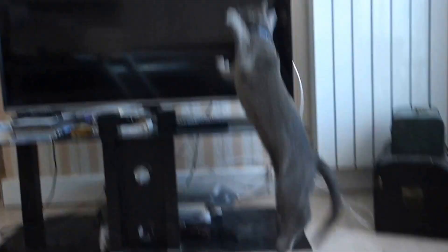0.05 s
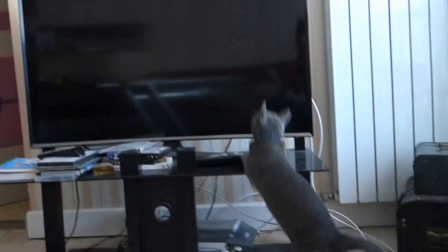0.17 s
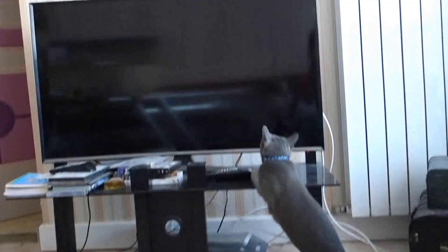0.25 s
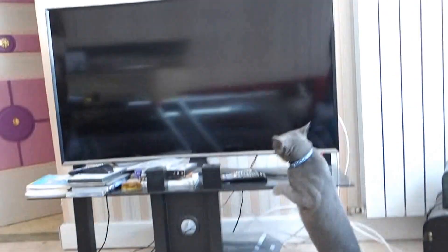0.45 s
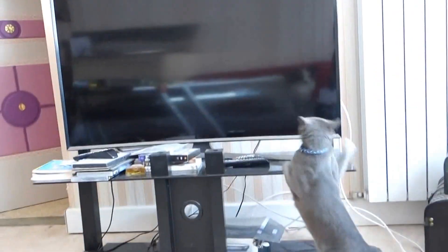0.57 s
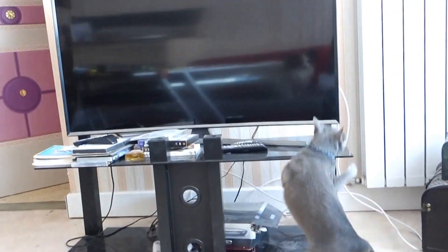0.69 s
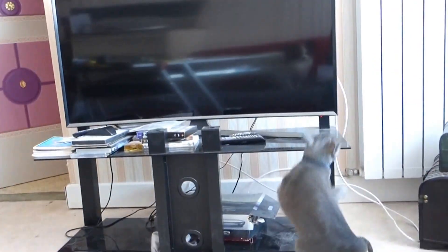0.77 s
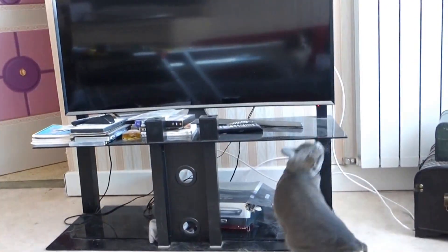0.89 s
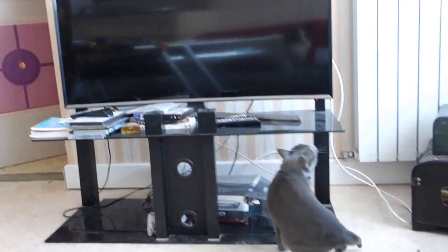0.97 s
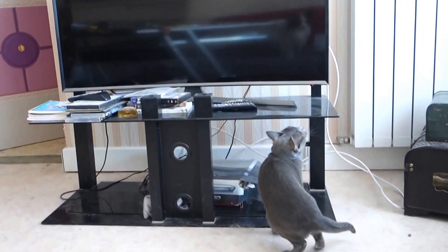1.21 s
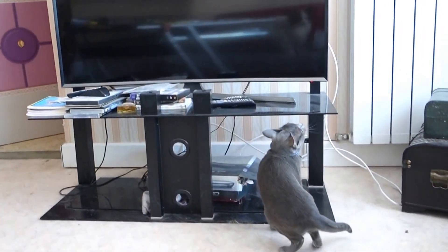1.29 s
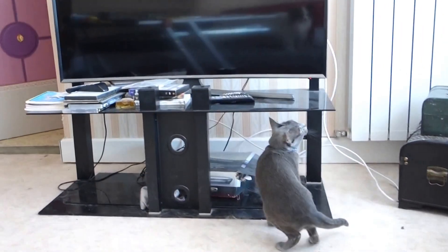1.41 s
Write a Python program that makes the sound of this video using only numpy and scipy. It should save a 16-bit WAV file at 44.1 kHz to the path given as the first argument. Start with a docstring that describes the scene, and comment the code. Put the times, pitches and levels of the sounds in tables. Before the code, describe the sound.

A cat clatters against a glass television stand, heard close in a living room with a short echo. A faint scuff, click and collar bell tinkle come first. At about 0.2 seconds the loud clatter sets the shelves briefly ringing. Lighter paw knocks follow from 0.4 to 0.75 seconds, then a dull floor thud with scuffs at 0.8. The high bell keeps jingling faintly, fading by 1.3 seconds.

```python
"""A faint scuff, a click and a tinkle of a collar bell, close by in a living room; then a cat drops
against a glass television stand. One loud clatter sets the shelves ringing, and lighter paw knocks follow.
The cat steps down and the floor gives a dull thud, while a loose pellet keeps striking the bell's shell.
A close stereo pair of microphones hears it all with a short room tail, brighter on the right."""
import sys
import numpy as np
from scipy import signal
from scipy.fft import rfft, irfft
from scipy.io import wavfile
from scipy.ndimage import uniform_filter1d

SR = 44100
rng = np.random.default_rng(int(sys.argv[2]) if len(sys.argv) > 2 else 0)


def store_wav(level_fs):
    """Save 16-bit WAV to argv[1]."""
    pcm = np.round(np.clip(np.atleast_2d(level_fs), -1, 1) * 32767)
    wavfile.write(sys.argv[1], SR, pcm.T.astype(np.int16))


N = 63945
T = np.arange(SR) / SR  # each event lasts one second
HZ = np.fft.rfftfreq(SR, 1 / SR)

# Levels are relative; t60 is the time to die away by 60 dB.
# decay of the living room: f/Hz, t60/s
ROOM_T60 = [(100, 0.54), (300, 0.31), (800, 0.42), (1500, 0.49), (3000, 0.38), (6000, 0.48), (14000, 0.28)]
# diffuse sound at the pair: f/Hz, left-right correlation
LIKENESS = [(30, 0.68), (100, .995), (280, 0.97), (500, .92), (1000, 0.75), (2000, .62), (4000, 0.37),
            (8000, 0.092), (15000, 0.099)]
# balance of the pair: f/Hz, left minus right/dB
BALANCE = [(100, 0), (500, -0.8), (1000, -0.5), (2000, -5), (4000, -8.5), (8000, -7.5), (14000, -9)]
# room tone and microphone hiss: f/Hz, level/dB
ROOM_TONE_COLOUR = [(25, -3), (70, -15), (120, -22.5), (200, -19), (330, -14.5), (470, -19), (580, -8.5),
                    (780, -12), (950, -3.5), (1200, -9), (2000, -13.5), (4200, -15), (8500, -19),
                    (14000, -16.5)]
# small dry clicks: t/s, level/dB
CLICKS = [(.0675, 0), (.468, -9), (.482, -10)]
# snap of a click: f/Hz, level/dB
CLICK_COLOUR = [(100, -47), (600, -28), (1200, -22), (2100, 3), (2700, -11), (3300, -2), (3780, 6.5),
                (4400, -2), (6000, -12), (8000, -11), (15000, -15)]
# ring of a click: f/Hz, level/dB, t60/s
CLICK_MODES = [(3360, -14, 0.024), (3690, -5.5, 0.029)]
# paw scuffs: t/s, level/dB
SCUFFS = [(0.017, -1), (.745, 11.5), (0.825, 14), (.843, 11), (1.002, 5.5), (1.072, -3.5)]
# rub of a paw: f/Hz, level/dB
SCUFF_COLOUR = [(100, -25), (800, -17), (2000, 4.5), (3500, 4), (5500, -2.5), (9000, -11), (15000, -25)]
# pellet strikes in the bell: t/s, ring pair level/dB, other partials and tick level/dB
JINGLES = [(.067, -10.5, -22), (.090, -14, -34), (.200, -2, -17), (.286, 1, -4), (0.323, -18, 1),
           (.333, -17, 6), (0.379, -19, -1.5), (0.477, -11.5, -9), (0.588, -14, -6.5), (.716, -12, -6),
           (.732, -3, -2.5), (.760, -2, 5.5), (.786, -6, 5), (.914, -1, 4), (.932, -6.5, -13),
           (0.987, -42, -8), (1.072, -22, -5), (1.284, -31, -21), (1.335, -39, -15)]
# the bell's beating pair near 10.6 kHz: f/Hz, level/dB, t60/s
BELL_PAIR = [(10610, -1, 0.31), (10700, -13, 0.61)]
# its other partials: f/Hz, level/dB, t60/s
BELL_OTHERS = [(7220, -26, 0.46), (7941, -36, 0.28), (10300, -27, .15), (11680, -3, 0.13), (11740, 1, 0.15),
               (12740, -16, .12)]
# tick of the pellet: f/Hz, level/dB
PELLET_COLOUR = [(2000, -44), (5500, -21), (7400, -0.5), (9000, -11.5), (11000, -0.5), (11900, 14),
                 (12800, -7), (15500, -34)]
# paws landing on the floor: t/s, level/dB
THUDS = [(.808, -1), (.830, -3), (0.854, -11.5)]
# boom of a landing: f/Hz, level/dB
THUD_COLOUR = [(40, -64), (90, -41), (170, -22), (230, -5), (285, 0.5), (350, -2.5), (430, -8), (560, -6.5),
               (1200, -13.5), (5000, -42)]
# ring of the floor: f/Hz, level/dB, t60/s
FLOOR_MODES = [(244.7, -15.5, 0.35), (283.5, 2.5, 0.2), (425, 4, .08)]
# tock that opens the fall: f/Hz, level/dB, t60/s
TOCK_MODES = [(815, 3, 0.024), (1036, 1, 0.051)]
# blows on the stand: t/s, level/dB, treble tilt/(dB per octave), bass/dB
KNOCKS = [(0.1989, -14, 4, -19), (.208, -5, 3.5, -11), (.212, -0.5, 2.5, -8.5), (0.2187, -1.5, 1, -4.5),
          (.237, -4, 0, 6), (.249, -6, -1, 8), (.285, -7, -4, 6.5), (.400, -18.5, 3.5, -9),
          (.411, -11, -1.5, -2.5), (0.443, -21.5, -16, -14), (.571, -17, 3, -13), (.584, -7.5, -5, -9),
          (.605, -27, -2, 0), (0.679, -12, -1.5, -15.5), (.694, -14, -6, -12), (.722, -21.5, 1, -12),
          (.749, -11, -4, -9), (.829, -18.5, 1, 19)]
# rattle of a blow: f/Hz, level/dB
KNOCK_COLOUR = [(40, -24), (80, -19), (120, -12), (170, -8), (250, -2), (450, 1), (700, 5.5), (1100, 6),
                (1900, 4), (2700, -2), (4000, -5.5), (6500, -15), (10000, -19.5), (14000, -21.5),
                (16000, -26)]
# ring of the glass stand: f/Hz, level/dB, t60/s
STAND_MODES = [(170.6, -18, 0.36), (304.3, -16.5, 0.44), (446.7, -13, 0.43), (592.4, -1, 0.45),
               (708.5, 3.5, 0.19), (777, -17, 0.12), (1191, -2, 0.53), (1630, 5.5, 0.24), (1856, -13, 0.11),
               (1911, 1, 0.19), (2080, 2, 0.19), (2135, 2, 0.21), (2890, -10.5, 0.56), (3697, 0.5, 0.12)]


def amp(db):
    """Decibels to gain."""
    return 10 ** (np.asarray(db) / 20)


def read(points, hz):
    """Reads a table on a log-frequency axis."""
    f, value = np.transpose(points)
    return np.interp(np.log(hz + 1), np.log(f + 1), value)


def add(mix, s, sound):
    """Adds a sound to both channels at s seconds."""
    part = mix[:, max(round(s * SR), 0):][:, :sound.shape[1]]
    part += sound[:, :part.shape[1]]


def colour(x, db):
    """Causal filter with the given gain at each frequency."""
    log_gain = np.log(amp(np.r_[db, db[-2:0:-1]]))
    response = np.exp(np.conj(signal.hilbert(log_gain)))[:len(HZ)]
    return irfft(rfft(x) * response, SR)


def onset(rise_s):
    """Envelope that eases a sound in."""
    return 1 - np.exp(-T / rise_s)


def ring(modes, vary_db=0):
    """Dying partials of a struck body; vary_db scatters their levels from blow to blow."""
    chance = rng.standard_normal(len(modes))
    return sum(amp(db + vary_db * a) * np.exp(-np.log(1000) * T / t60) * np.sin(2 * np.pi * hz * T)
               for (hz, db, t60), a in zip(modes, chance))


def spread(x):
    """Makes two unrelated channels alike in the bass, as diffuse sound is at closely spaced microphones."""
    mid, side = rfft(x)
    likeness = read(LIKENESS, np.fft.rfftfreq(x.shape[1], 1 / SR))
    turn = np.arccos(np.clip(likeness, -1, 1)) / 2
    return irfft(mid * np.cos(turn) + np.array([[1], [-1]]) * side * np.sin(turn), x.shape[1])


def room_tone(level_db=-64, top_hz=14500):
    """Steady faint air of the room, with microphone hiss."""
    hz = np.fft.rfftfreq(N, 1 / SR)
    noise = spread(rng.standard_normal((2, N)))
    air = irfft(rfft(noise) * amp(read(ROOM_TONE_COLOUR, hz)) * (hz < top_hz), N)
    return amp(level_db) * air / air.std()


def reflections():
    """Dense echoes from one spot in the room, each band dying at its own speed; unit energy per side."""
    taps = rng.standard_normal((2, SR)) * (rng.random(SR) < .2)
    hz, t, bands = signal.stft(spread(taps), SR, nperseg=256)
    decay = amp(-60 * t / read(ROOM_T60, hz)[:, None])
    tail = signal.istft(bands * decay, SR, nperseg=256)[1][:, :SR] * onset(rise_s=.0017)
    return tail / np.sqrt((tail ** 2).sum() / 2)


def clicks(decay_s=.0014):
    """Small hard parts snap and ring very briefly, close to the microphones and dry."""
    out = np.zeros((2, N))
    for s, db in CLICKS:
        burst = rng.standard_normal((1, SR)) * np.exp(-T / decay_s)
        snap = colour(burst, read(CLICK_COLOUR, HZ) - 33)
        add(out, s, amp(db) * (snap + amp(-41) * ring(CLICK_MODES)))
    return out


def paw_scuffs(gain_db=-27.5):
    """Paws slide briefly, each a soft rub that trails into the room."""
    out = np.zeros((2, N))
    for s, db in SCUFFS:
        slide = reflections() * onset(rise_s=.0017)
        add(out, s, colour(slide, gain_db + db + read(SCUFF_COLOUR, HZ)))
    return out


def collar_bell(ring_db=-42.5, pellet_db=-19, wet_db=-7, wander_hz=6.3):
    """A loose pellet ticks on the shell and rings its partials; the swing bends their pitch slightly."""
    out = np.zeros((2, N))
    for s, pair_db, others_db in JINGLES:
        shell = amp(pair_db) * ring(BELL_PAIR) + amp(others_db) * ring(BELL_OTHERS)
        swing = uniform_filter1d(rng.standard_normal(SR), size=1000)
        bend = np.exp(2j * np.pi * wander_hz * np.cumsum(swing / swing.std()) / SR)
        tone = (signal.hilbert(shell * onset(rise_s=.003)) * bend).real
        direct = tone * amp([[-6.5], [0]])  # weaker at the left microphone
        echoes = reflections()
        wet = signal.fftconvolve(tone[None], echoes, axes=1)[:, :SR]
        wet *= np.linalg.norm(tone) / np.linalg.norm(wet, axis=1, keepdims=True)
        pellet = colour(echoes, pellet_db + others_db + read(PELLET_COLOUR, HZ))
        add(out, s, amp(ring_db) * (direct + amp(wet_db) * wet) + pellet)
    return out


def floor_thuds(boom_db=12.5, boards_db=-34.5, rise_s=.0033):
    """Soft paws push the floor, which booms briefly into the room."""
    out = np.zeros((2, N))
    for s, db in THUDS:
        boards = amp(boards_db) * ring(FLOOR_MODES) * (1 - np.exp(-(T / rise_s) ** 2))
        boom = colour(reflections(), boom_db + read(THUD_COLOUR, HZ))
        add(out, s, amp(db) * (boom + boards))
    return out


def first_contact(graze_db=-9, tock_db=-26.5):
    """A light graze and a short tock open the fall against the stand."""
    out = np.zeros((2, N))
    add(out, .191, colour(reflections(), graze_db + read(KNOCK_COLOUR, HZ)))
    add(out, .1975, amp(tock_db) * ring(TOCK_MODES)[None] * onset(rise_s=.0029))
    return out


def glass_stand(rattle_db=9, shelves_db=-39.5, crack_s=.002, bass_hz=410, tilt_hz=1296):
    """Each blow is a wash of rattle and reflections over ringing shelves; harder blows also crack."""
    out = np.zeros((2, N))
    for s, db, tilt_db, bass_db in KNOCKS:
        crack = rng.standard_normal(SR) * np.exp(-T / crack_s)
        crack *= amp(-9 + 2.5 * tilt_db) / np.linalg.norm(crack)
        rattle = colour(reflections() + crack, rattle_db + read(KNOCK_COLOUR, HZ))
        shelves = amp(shelves_db) * ring(STAND_MODES, vary_db=4.5) * onset(rise_s=.0019)
        treble = tilt_db * np.log2(np.maximum(HZ / tilt_hz, 1))
        bass = bass_db / (1 + (HZ / bass_hz) ** 2)
        add(out, s, amp(db) * colour(rattle + shelves, treble + bass))
    return out


def scene():
    """The living room, from its still air to the clatter of the stand."""
    background = room_tone() + clicks() + paw_scuffs()
    return background + collar_bell() + floor_thuds() + first_contact() + glass_stand()


def record(dry, right_lag_s=2.2e-5, low_cut_hz=115, top_hz=16000):
    """The right microphone hears the room a moment later and brighter; then low cut and band limit."""
    hz = np.fft.rfftfreq(2 * N, 1 / SR)
    lean_db = read(BALANCE, hz) / 2
    microphones = np.array([amp(lean_db), amp(-lean_db) * np.exp(-2j * np.pi * hz * right_lag_s)])
    heard = irfft(rfft(dry, 2 * N) * microphones)[:, :N]
    heard = signal.sosfilt(signal.butter(2, low_cut_hz, "high", fs=SR, output="sos"), heard)
    band_limit = signal.firwin(511, top_hz, window=("kaiser", 9), fs=SR)
    return signal.oaconvolve(heard, band_limit[None], "same")


dry = scene()
out = record(dry)
store_wav(out)
```